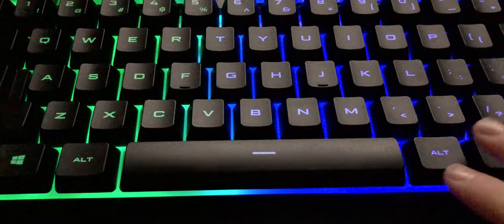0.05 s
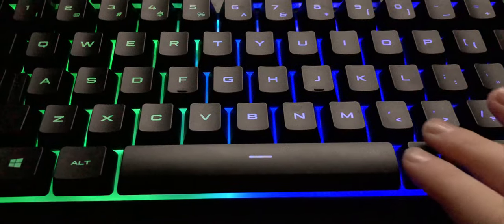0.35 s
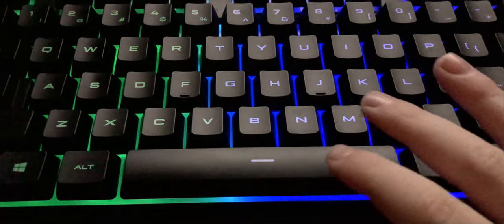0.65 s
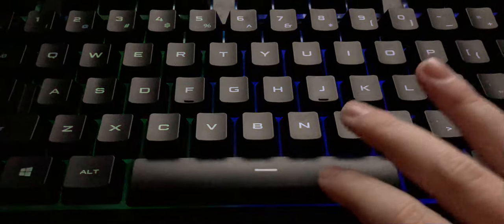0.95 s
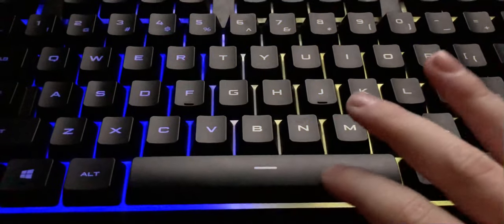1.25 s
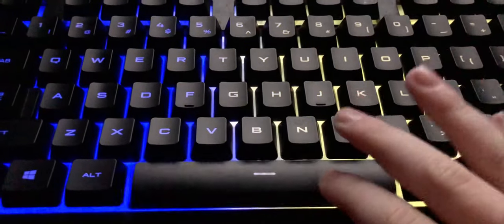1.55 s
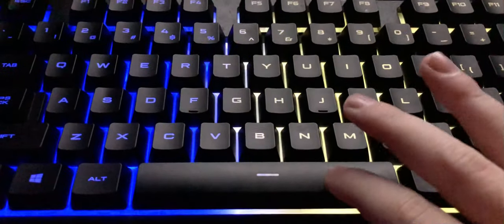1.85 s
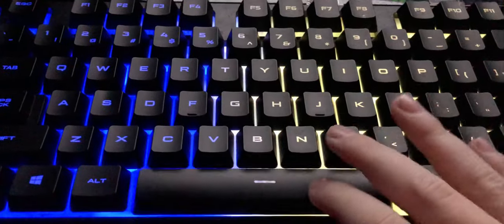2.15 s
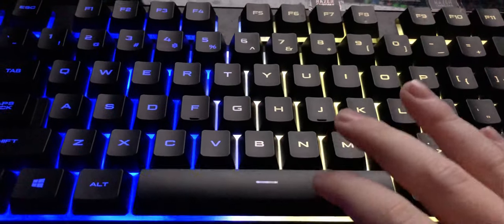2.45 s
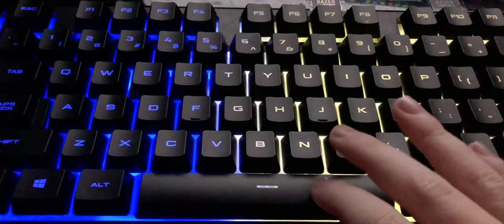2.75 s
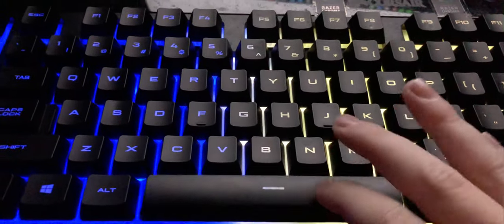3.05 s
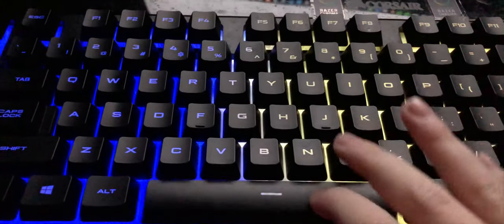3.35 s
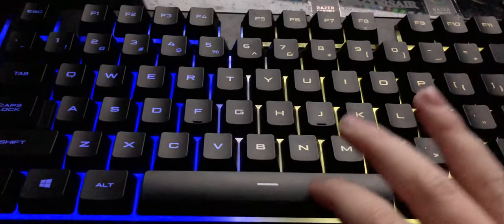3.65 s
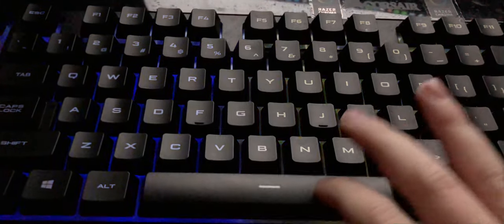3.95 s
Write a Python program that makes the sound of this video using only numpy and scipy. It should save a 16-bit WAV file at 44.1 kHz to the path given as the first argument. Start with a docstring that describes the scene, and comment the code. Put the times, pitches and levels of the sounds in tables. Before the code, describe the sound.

Rapid, even clacks come from a thumb tapping a computer keyboard's space bar, following a few light key touches. The loose bar rattles and clicks as it springs back, thumping the desk softly, heard close in a quiet room.

```python
"""At a desk in a quiet room, a thumb taps a plastic keyboard's space bar about five times a second.
Each stroke has four sounds: a sharp clack as the bar is struck, a dull clatter as it bottoms out,
a tick as it lifts and a knock at its top stop. The keyboard case rings briefly and the desk thumps
under it. In between, the loose bar rattles, its steadying wire chinks and its spring tings."""
import sys
import numpy as np
from scipy import signal
from scipy.fft import rfft, irfft, next_fast_len
from scipy.io import wavfile

SR = 44100
rng = np.random.default_rng(int(sys.argv[2]) if len(sys.argv) > 2 else 0)


def to_wav(s):
    """Save 16-bit WAV."""
    ch = np.atleast_2d(s).T  # columns
    pcm = np.round(np.clip(ch, -1, 1) * 32767)  # PCM
    wavfile.write(sys.argv[1], SR, pcm.astype(np.int16))


N = 176400
AGE = np.arange(int(.2 * SR)) / SR  # seconds since a hit began
SPLIT_HZ, TOP_HZ = 3500, 16450  # where the treble begins and ends; the "body" lies below it

# When the bar hits something. Each row: start in seconds, then body, treble and thump in relative dB.
STRIKE_HITS = [(0.7012, -40.5, -34.5, -47), (0.8807, -47.5, -43.5, -56.5), (1.0765, -49.5, -61, -64),
               (1.263, -49, -64, -64), (1.4786, -44.5, -42, -54.5), (1.6714, -46.5, -43.5, -57),
               (1.8746, -43.5, -40, -50.5), (2.0842, -41.5, -38.5, -50.5), (2.2672, -43.4, -41, -50.5),
               (2.4836, -40.2, -35.5, -48.5), (2.671, -46.5, -41, -49), (2.8782, -38, -34, -48.5),
               (3.0846, -48.5, -44.5, -53.5), (3.2922, -43.5, -37.5, -49), (3.5168, -43.5, -37.5, -49),
               (3.724, -39.5, -32, -44), (3.9368, -38, -31, -46.5)]  # the thumb strikes the bar
BOTTOM_HITS = [(0.745, -47, -53, -49), (0.93, -51.5, -55.5, -50), (1.13, -50.5, -59, -50.5),
               (1.319, -54, -67, -52.5), (1.515, -52.5, -61, -54.5), (1.709, -52.5, -60, -51.5),
               (1.903, -48.5, -55, -48), (2.113, -49.5, -54, -49), (2.305, -49.5, -52.5, -45.5),
               (2.5112, -50, -53, -50.5), (2.702, -46.5, -53, -47), (2.9023, -47.5, -51, -46.5),
               (3.1167, -52, -54, -50), (3.323, -48.5, -54, -50), (3.546, -45, -48.5, -44.4),
               (3.754, -42, -44, -45), (3.966, -41.5, -46, -42)]  # the bar bottoms out
TOP_STOP_HITS = [(0.826, -42, -59, -47.5), (1.025, -41.5, -59.5, -46), (1.217, -43.5, -60, -47),
                 (1.404, -41, -56, -46), (1.605, -40, -54, -46.5), (1.803, -41.5, -54, -46.4),
                 (2.005, -40.5, -50, -46.5), (2.202, -40.5, -52, -45.5), (2.3955, -41.5, -52.5, -46.9),
                 (2.599, -40, -56, -45.5), (2.79, -40.5, -52, -44.5), (3.015, -40.5, -50.6, -46.5),
                 (3.208, -39, -49.5, -45), (3.433, -39, -48.5, -45), (3.633, -35.5, -48.5, -44),
                 (3.838, -38, -51, -46)]  # the bar comes back to its top stop
# The tone of a rattle. Each row: frequency in Hz, boost or cut in dB.
RATTLE_TONE = [(150, -21), (400, -16), (600, -0.5), (1200, 3), (1700, 6.5), (2300, -7.5), (3200, -7.5),
               (4500, -21.5), (8300, -25.5), (11500, -33.5), (15000, -35)]


def undb(db):
    """Turn decibels into a number to multiply by."""
    return 10 ** (np.asarray(db) / 20)


def fade(t60):
    """A smooth fall that is 60 dB down after t60 seconds, the fade time."""
    return np.exp(-np.log(1000) * AGE / t60)


def burst(t60):
    """A snap of noise that dies away."""
    return rng.standard_normal(len(AGE)) * fade(t60)


def level(x, db):
    """Scale a hit so that its energy, packed into 10 ms, has this level."""
    return x * undb(db) / np.sqrt(np.sum(x ** 2) / (.01 * SR))


def add(out, start_s, x):
    """Mix x into out at the given time."""
    i = max(int(start_s * SR), 0)
    n = max(min(len(x), len(out) - i), 0)
    out[i:i + n] += x[:n]


def keep_band(x, hz, kind):
    """Keep what is below hz ("low"), above it ("high") or between two frequencies ("band")."""
    return signal.sosfilt(signal.butter(3, hz, kind, fs=SR, output="sos"), x)


def colour(x, tone):
    """Shape a sound with a tone curve drawn through (Hz, dB) points."""
    n = 2 * next_fast_len(len(x) // 2 + 1)
    hz, db = np.array(tone, float).T
    curve_db = np.interp(np.log(np.arange(n // 2 + 1) * SR / n + 1), np.log(hz), db)
    # Fold the filter in time, so that it rings only after a hit, never before.
    folded = irfft(np.log(undb(curve_db)))
    folded[1:n // 2] *= 2
    folded[n // 2 + 1:] = 0
    return irfft(rfft(x, n) * np.exp(rfft(folded)))[:len(x)]


def room_air():
    """Still room air with a soft, low rumble."""
    # The tone of the air. Each row: frequency in Hz, boost or cut in dB.
    air_tone = [(15, -67), (25, -20.5), (80, -2), (114, -21), (166, -13), (285, -17), (317, -16),
                (363, -20.5), (1560, -32), (2610, -37.5), (12500, -41.5), (16000, -55)]
    air = colour(rng.standard_normal(N), air_tone)
    return undb(-68) * air / np.std(air)


def room_echo(x):
    """One bounce off the nearest hard surface, then a soft wash that follows the sound in each band."""
    # The room's echo. Each row: low and high edge in Hz, level in dB, fade time in seconds.
    echo_bands = [(295, 645, -7.5, 0.21), (850, 1540, -10.5, 0.17), (1390, 2800, -13.5, 0.2),
                  (2800, 5900, -15, 0.31), (6250, 8200, -14, 0.31), (9150, 13300, -15, .24),
                  (13000, 14000, -14, .21)]
    out = np.zeros(N)
    add(out, 0.011, undb(-19) * x)
    for low_hz, high_hz, db, t60 in echo_bands:
        band = [low_hz, high_hz]
        decay = (fade(t60) * (1 - np.exp(-AGE / 0.0013))) ** 2
        energy = signal.fftconvolve(keep_band(x, band, "band") ** 2, decay / decay.sum())[:N]
        wash = keep_band(rng.standard_normal(N), band, "band")
        out += undb(db) * np.sqrt(np.abs(energy)) * wash / np.std(wash)
    return out


def thumps(rows, lag_s, thud_hz, thud_s, ring_lag_s, ring_hz, octaves, ring_db, fade_scale, db):
    """The case swings a few times on the desk, and the desk rings on, favouring notes near ring_hz."""
    # The desk's own notes. Each row: pitch in Hz, relative level in dB, base fade time in seconds.
    desk_notes = [(48, 3, 0.22), (72.2, -3, 0.22), (101.7, -19.5, 0.23), (137, -3.5, 0.22),
                  (185.1, -2.5, 0.12), (211.6, 0.5, 0.16), (245.2, -1, 0.075), (321.2, -5, 0.13),
                  (355.8, -4, 0.11)]
    out = np.zeros(N)
    swell = (AGE / thud_s) ** 2 * np.exp(-(AGE / thud_s) ** 2)
    for start, _, _, thump_db in rows:
        hit = level(swell * np.sin(2 * np.pi * thud_hz * rng.normal(1, .025) * AGE), 0)
        ring = 0
        for hz, note_db, t60 in desk_notes:
            size = undb(rng.normal(note_db, 2)) / (1 + (np.log2(hz / ring_hz) / octaves) ** 2)
            pitch = hz * rng.normal(1, 0.0088)
            ring += size * fade(t60 * fade_scale) * np.sin(2 * np.pi * pitch * AGE)
        add(hit, ring_lag_s, level(ring * (1 - np.exp(-AGE / 0.0085)), ring_db))
        add(out, start + lag_s, level(hit, thump_db + db))
    return out


def desk():
    """The desk thumps just after the bar is struck, bottoms out and hits its top stop."""
    strikes = thumps(STRIKE_HITS, lag_s=0.00514, thud_hz=238.3, thud_s=0.01, ring_lag_s=0.0101,
                     ring_hz=200, octaves=1.2, ring_db=-6.5, fade_scale=0.92, db=3.5)
    bottoms = thumps(BOTTOM_HITS, lag_s=0.00404, thud_hz=245, thud_s=0.012, ring_lag_s=0.01287,
                     ring_hz=169, octaves=1, ring_db=1.5, fade_scale=0.69, db=4)
    top_stops = thumps(TOP_STOP_HITS, lag_s=0.00051, thud_hz=172, thud_s=0.0093, ring_lag_s=0.00623,
                       ring_hz=168, octaves=.9, ring_db=3, fade_scale=1, db=3)
    return strikes + bottoms + top_stops


def spring_tings():
    """The spring under the bar gives a very short, high ring when the bar jolts it."""
    # Jolts of the spring. Each row: start in seconds, relative level in dB.
    jolts = [(0.819, -49), (0.8275, -50), (0.9288, -47.5), (1.0261, -46), (1.0874, -57), (1.122, -52.5),
             (1.256, -53), (1.275, -51), (1.3094, -49), (1.4057, -43), (1.708, -47), (1.9021, -49),
             (2.3043, -45), (2.598, -48), (2.704, -43), (3.039, -55), (3.118, -51), (3.5454, -49),
             (3.7534, -48), (3.9664, -34)]
    out = np.zeros(N)
    for start, db in jolts:
        pitches_hz = 11530 * np.exp(rng.normal(0, .05, 3))
        ring = sum(np.sin(2 * np.pi * hz * AGE) for hz in pitches_hz)
        ting = ring * fade(t60=0.0097) * (1 - np.exp(-AGE / .0005))
        add(out, start, level(ting, db - 14))
    return out


def wire_chink(hz):
    """The wire that steadies the bar rings briefly, at a slightly different pitch each time."""
    return np.sin(2 * np.pi * hz * np.exp(rng.normal(0, 0.061)) * AGE) * fade(t60=0.012)


def bar_wobble(count=6, span_s=.075, fall_db=9):
    """Held down, the loose bar wobbles in a run of small, fading chinks and ticks."""
    out = np.zeros(N)
    for start, body, *_ in BOTTOM_HITS:
        for progress in (np.arange(count) + rng.uniform(.3, 1, size=count)) / count:
            tick = colour(burst(t60=0.01), RATTLE_TONE)
            wobble = level(wire_chink(hz=1826), -1) + level(tick, 0)
            db = body - 7.5 - fall_db * progress + rng.standard_normal()
            add(out, start + progress * span_s, level(wobble, db))
    return out


def case_ring():
    """The bar and case ring with many short notes at once, a little differently on each hit."""
    # The plastic's own notes. Each row: pitch in Hz, relative level in dB, fade time in seconds.
    case_notes = [(445, -12.5, 0.065), (569.3, -10.5, 0.073), (788, -16, 0.1), (1139.6, 2.5, 0.028),
                  (1255, -4.5, 0.032), (1362, -9.5, 0.029), (1704, -6.5, 0.042), (2267, 1.5, 0.018),
                  (2770, 0.5, 0.012), (4645, 2, 0.012), (6450, 9.5, 0.0063), (8540, 6, 0.016),
                  (10550, 2.5, 0.013)]
    ring = 0
    for hz, db, t60 in case_notes:
        size = undb(rng.normal(db, 1.77))
        pitch = hz * rng.normal(1, 0.028)
        ring += size * fade(t60) * np.sin(2 * np.pi * (pitch * AGE + rng.random()))
    return ring


def contacts(rows, tone, crack_t60, rise_s, ring_db, bounce_s, bounce_db, body_db, treble_db,
             graze_s=0, graze_db=-60, chink_hz=None, chink_db=0):
    """Plastic on plastic: a light graze, a crack that rings the case, then four small bounces."""
    out = np.zeros(N)
    same_crack, same_share = burst(crack_t60), .12  # this part of the crack repeats on every hit
    usual_treble = np.median([row[2] for row in rows])
    for start, body, treble, *_ in rows:
        crack = np.sqrt(same_share) * same_crack + np.sqrt(1 - same_share) * burst(crack_t60)
        impact = level(crack, 0) + level(case_ring(), ring_db)
        if chink_hz:
            impact += level(wire_chink(chink_hz), chink_db)
        hit = level(burst(crack_t60), graze_db)
        add(hit, graze_s, impact * (1 - np.exp(-AGE / rise_s)))
        for progress in (np.arange(4) + rng.uniform(.3, 1, size=4)) / 4:
            bounce = level(burst(t60=0.015), rng.normal(bounce_db - 9 * progress, 2))
            add(hit, graze_s + progress * bounce_s, bounce)
        hit = colour(hit, tone)
        low, high = keep_band(hit, SPLIT_HZ, "low"), keep_band(hit, SPLIT_HZ, "high")
        brighter_db = 0.49 * (treble - usual_treble)  # a harder blow sounds brighter
        high = colour(high, [(SPLIT_HZ, 0), (TOP_HZ, brighter_db)])
        add(out, start - graze_s, level(low, body + body_db) + level(high, treble + treble_db))
    return out


def space_bar():
    """The bar is struck, bottoms out, lifts and hits its top stop, with rattles in between."""
    # The lighter contacts. Each row: start in seconds, then body and treble in relative dB.
    lift_hits = [(0.8115, -46, -62), (1.0115, -44, -61.5), (1.2035, -47.5, -65.3), (1.3905, -48.2, -61),
                 (1.5915, -50.2, -66), (1.7885, -47.5, -66.3), (1.9915, -48.5, -63.8), (2.1885, -46.8, -63),
                 (2.382, -44, -59.7), (2.5865, -46.2, -61), (2.778, -44.5, -59.5), (3.002, -45.5, -62.1),
                 (3.1955, -48.0, -65), (3.4195, -51, -62), (3.624, -42.5, -57), (3.8265, -41.5, -56.5)]  # the bar lifts off
    rattle_hits = [(0.083, -57.5, -62), (0.093, -55, -71), (0.393, -50.5, -57.5), (0.44, -63.5, -91),
                   (0.734, -52, -52), (0.774, -58, -78), (0.838, -55.5, -64), (0.924, -49.5, -58),
                   (0.982, -77, -83), (1.036, -61, -59), (1.124, -52, -60), (1.178, -75, -76.9),
                   (1.252, -58, -59), (1.311, -51.5, -58), (1.361, -69, -78.7), (1.718, -52.5, -76),
                   (1.762, -65, -84), (1.945, -79, -89), (2.123, -54, -58), (2.314, -48, -53.5),
                   (2.349, -67, -72), (2.524, -52.5, -63), (2.552, -56.5, -79), (2.713, -62, -60.5),
                   (2.744, -63, -62), (2.943, -56, -62), (3.131, -53.5, -54), (3.338, -64, -76),
                   (3.556, -47.5, -57), (3.746, -50, -59), (3.78, -53, -67), (3.805, -79, -75),
                   (3.993, -53, -63)]  # light touches and loose keys
    # The tone of each kind of contact. Each row: frequency in Hz, boost or cut in dB.
    strike_tone = [(150, 0.5), (400, -17), (600, -0.5), (850, -8), (1200, 2), (2300, -0.5), (3200, -0.5),
                   (4500, -0.5), (6500, -5.5), (8300, -7), (9700, -11.5), (11500, -8.5), (15000, -18.5)]
    bottom_tone = [(150, -8), (400, -10), (600, -0.5), (1200, -3.5), (1700, 1), (2300, -6.5), (3200, -15.5),
                   (4500, -22.5), (9000, -27), (11500, -23.5), (15000, -32.5)]
    lift_tone = [(150, -24), (400, -24.5), (600, 2), (850, -26.5), (1200, 2), (1700, -6.5), (2500, -5.5),
                 (3300, -17), (6500, -29), (9500, -34), (11500, -26), (15000, -57)]
    top_stop_tone = [(150, -10.5), (400, -7), (600, -7.5), (850, -5), (1200, -6), (1700, -5), (2300, -12),
                     (4500, -17), (6800, -20.5), (9700, -26), (11500, -26.5), (15000, -37.5)]
    wire_hz = 2338  # the wire chinks as the bar settles on it
    clacks = contacts(STRIKE_HITS, strike_tone, crack_t60=0.011, rise_s=0.00048, ring_db=-7.5,
                      bounce_s=0.0076, bounce_db=-15.5, body_db=0.5, treble_db=-1,
                      graze_s=0.0025, graze_db=-15)
    clatters = contacts(BOTTOM_HITS, bottom_tone, crack_t60=0.013, rise_s=0.00038, ring_db=-11.5,
                        bounce_s=0.013, bounce_db=-3, body_db=3, treble_db=-1.5,
                        chink_hz=wire_hz, chink_db=-7.5)
    ticks = contacts(lift_hits, lift_tone, crack_t60=0.0094, rise_s=.0001, ring_db=-3.5,
                     bounce_s=0.0043, bounce_db=-10.5, body_db=0, treble_db=5,
                     graze_s=.0005, graze_db=-9.5)
    knocks = contacts(TOP_STOP_HITS, top_stop_tone, crack_t60=0.012, rise_s=0.00092, ring_db=-3.5,
                      bounce_s=.012, bounce_db=-8, body_db=-2, treble_db=1.5,
                      graze_s=0.0048, graze_db=-15)
    rattles = contacts(rattle_hits, RATTLE_TONE, crack_t60=0.0086, rise_s=0.0012, ring_db=-9,
                       bounce_s=0.01, bounce_db=-7.5, body_db=1, treble_db=0,
                       chink_hz=wire_hz, chink_db=-4)
    return clacks + clatters + ticks + knocks + rattles


def scene():
    """The keyboard and desk close by, with the keyboard's echo and the room air, in one channel."""
    keys = space_bar() + bar_wobble() + spring_tings()
    return (keys + desk() + room_echo(keys) + room_air())[None]


def record(dry):
    """Cut away the deepest rumble and the highest treble."""
    lean = keep_band(dry, hz=40, kind="high")
    return signal.sosfilt(signal.ellip(8, .2, 70, TOP_HZ, fs=SR, output="sos"), lean)


dry = scene()
out = record(dry)
to_wav(out)
```